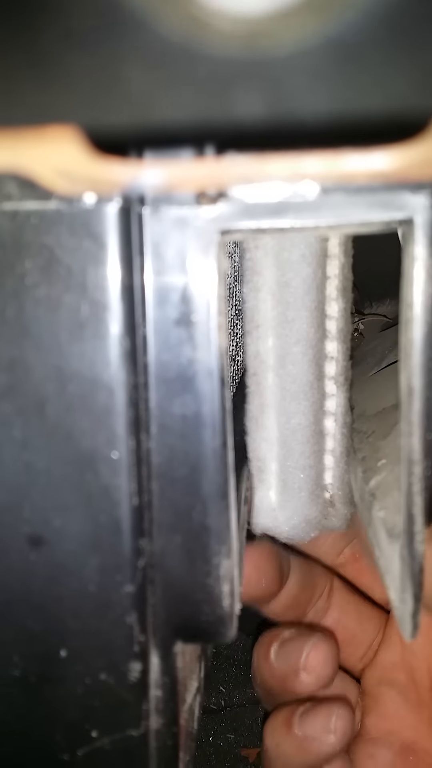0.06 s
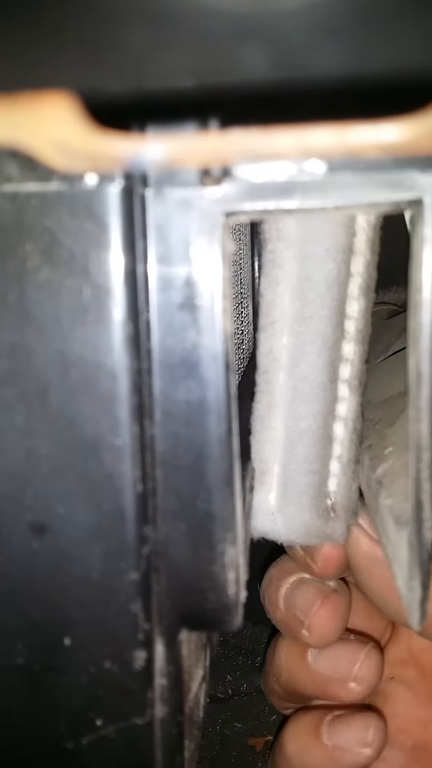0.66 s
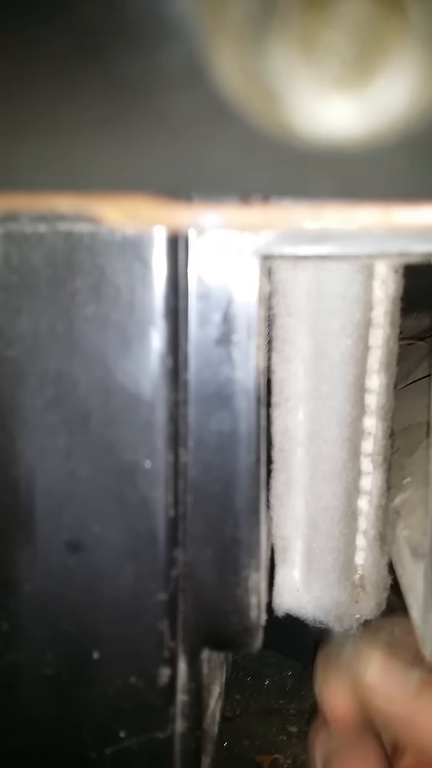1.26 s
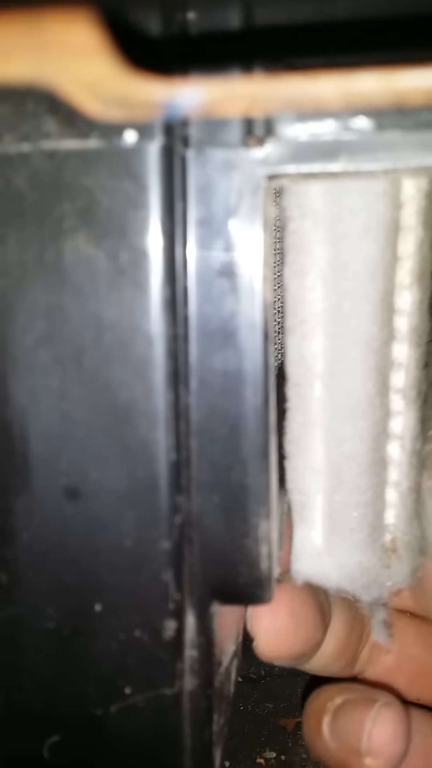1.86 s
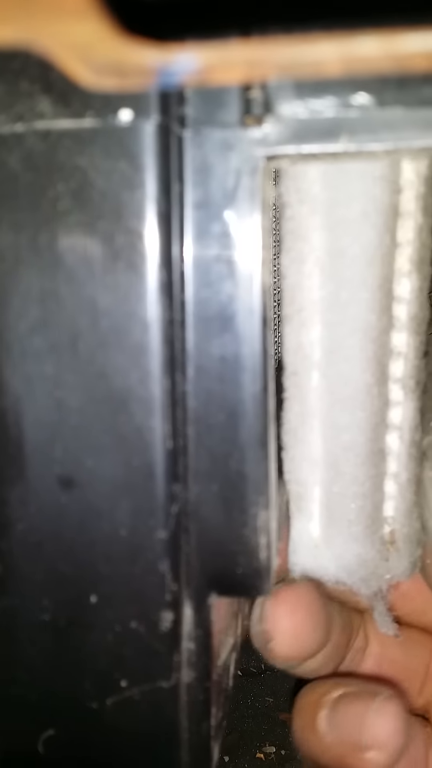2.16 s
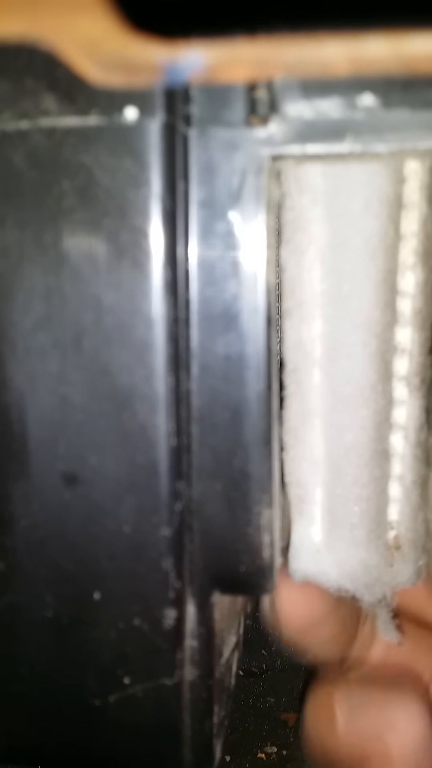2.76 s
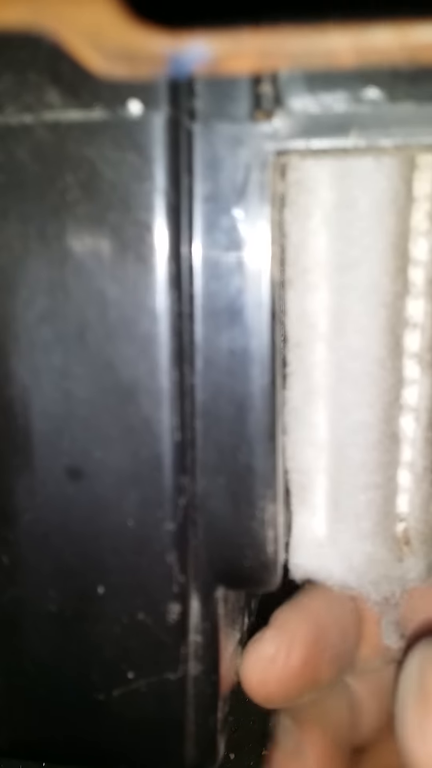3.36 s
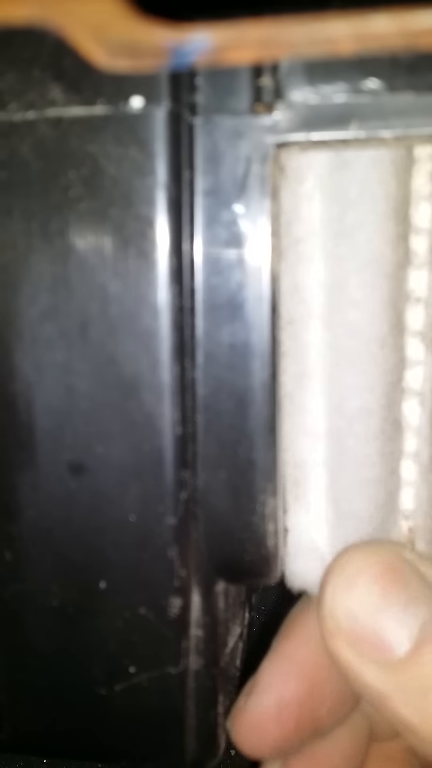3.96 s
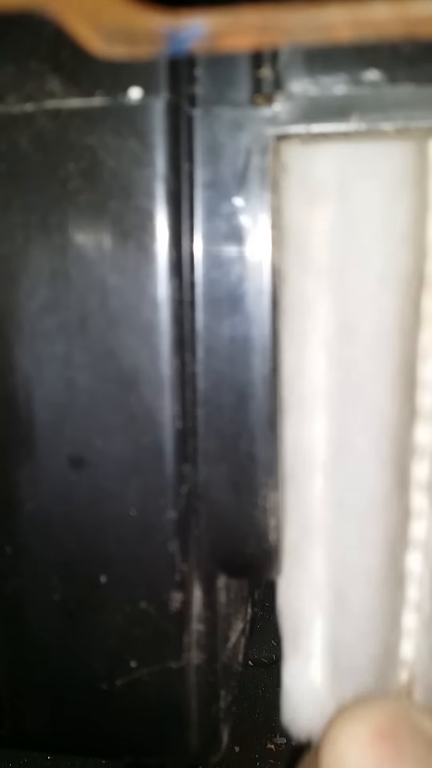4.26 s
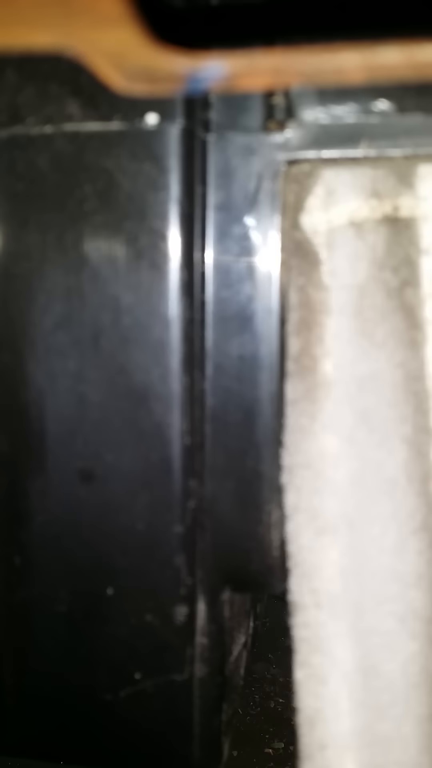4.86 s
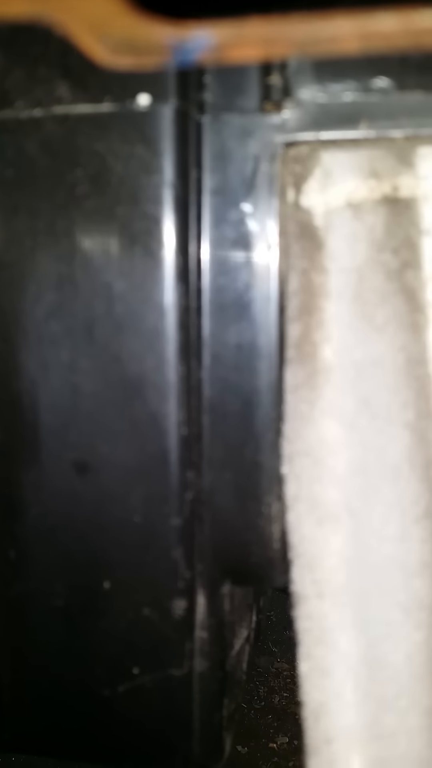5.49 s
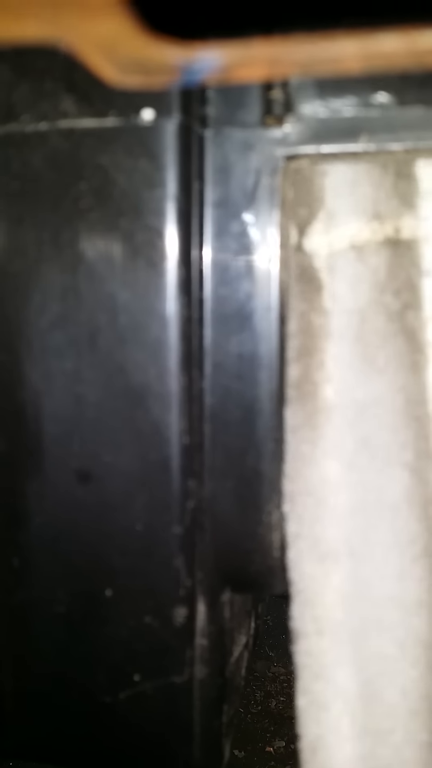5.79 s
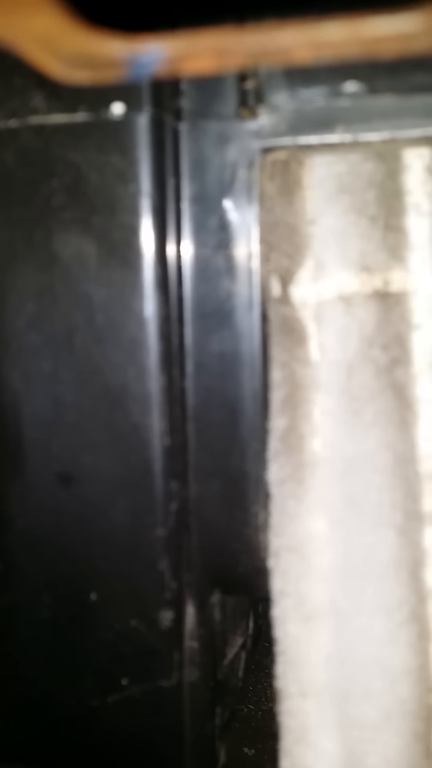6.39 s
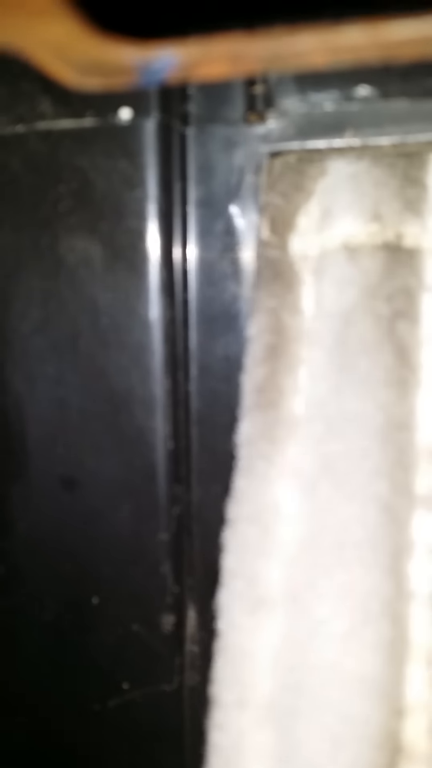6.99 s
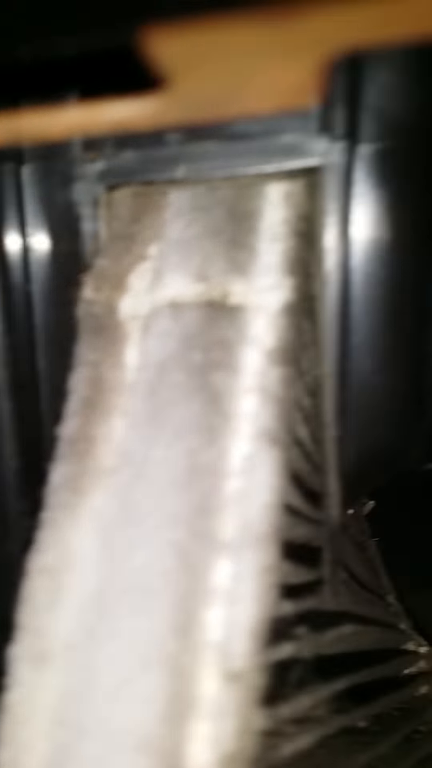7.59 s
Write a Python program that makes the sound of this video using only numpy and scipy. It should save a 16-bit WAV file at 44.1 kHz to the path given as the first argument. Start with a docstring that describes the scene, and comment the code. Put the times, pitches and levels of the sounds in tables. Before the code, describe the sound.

Close to the microphone, a hand works a pleated air filter out of its plastic housing. Light scrapes, finger rubs and soft taps come first. Then a hard tug brings a loud rasp with a cluster of snaps and hollow thuds. More pulls follow, the felt hissing over the plastic with sharp clicks and knocks. Small birds chirp faintly some way off over quiet outdoor air.

```python
"""A pleated air filter is worked out of its plastic housing by hand, close to the microphone.
Its felt drags over the plastic in strokes: many tiny slips hiss and make the walls rasp.
Pleats snap past the rim, the hollow box thuds and shudders, and fingers skid and tap on it.
Small birds chirp some way off, over faint outdoor air."""
import sys
import numpy as np
from scipy import signal
from scipy.fft import rfft, irfft, next_fast_len
from scipy.io import wavfile

SR = 44100
rng = np.random.default_rng(int(sys.argv[2]) if len(sys.argv) > 2 else 0)


def to_wav(sig):
    """Store sig (one row per channel, or 1-D mono) as 16-bit WAV at the path in sys.argv[1].

    Samples outside -1..1 are clipped; the rate is SR.
    """
    pcm = np.clip(np.atleast_2d(sig), -1, 1) * 32767
    pcm = np.round(pcm).astype(np.int16)
    wavfile.write(sys.argv[1], SR, pcm.T)  # frames by channels


N = 341334
TIME = np.arange(N) / SR
FFT_SIZE = next_fast_len(N + SR // 2)
FREQS = np.maximum(np.arange(FFT_SIZE // 2 + 1) * SR / FFT_SIZE, 1)
RUB_FADE_S = 0.059

# The tones at which the plastic walls ring. Each row: pitch in Hz, width in Hz, level in dB.
WALL_MODES = [(406, 340, -5.5), (536, 58, 3.5), (616, 36, 1), (801, 142, -1), (1140, 470, -7),
              (1427, 58, 0), (1820, 360, -8.5), (2234, 120, -4), (2408, 144, -1.5), (2740, 570, -5.5),
              (4190, 1280, -8.5)]
# The tones of the thin plastic under a nail. Each row: pitch in Hz, width in Hz, level in dB.
THIN_PLASTIC_MODES = [(1035, 180, -2.5), (1486, 140, 2.5), (1900, 900, -5), (2440, 430, 0.5),
                      (3400, 6900, -15)]
# Fingers rub the left wall. Each row: start and end in seconds, then rumble, hiss and rasp in dB.
FINGER_RUBS = [(1.275, 1.894, -46.5, -58.5, -41), (2.415, 2.958, -47, -69, -73),
               (4.916, 5.144, -36.5, -53, -44.5), (5.103, 5.592, -32.5, -51.5, -41)]


def felt_drag(hiss_db, rasp_db):
    """Fibres catch and let go, more often in a hard pull; they hiss and set the walls ringing."""
    # The tone colour of the hiss. Each row: frequency in Hz, level in dB.
    felt_spectrum = [(500, 5), (2000, -4), (4400, -1), (6200, -3.5), (7300, 0), (8400, -1), (10000, -5),
                     (12500, -9.5), (15000, -22)]
    # The left wall under the fingertips. Each row: pitch in Hz, width in Hz, level in dB.
    left_wall_modes = [(1392, 59, 12), (2080, 300, -19), (2160, 76, 3)]
    slips_per_s = 7000 * from_db(.5 * (hiss_db + 50))
    hiss = from_db(hiss_db) * radiate(slips(slips_per_s, spread_db=1), colour(felt_spectrum))
    wall_force = slips(.4 * slips_per_s, spread_db=1)
    walls = flexed(radiate(wall_force, resonances(WALL_MODES) * band(250, 2680)))
    fingertips = radiate(slips(3300, spread_db=-20), resonances(left_wall_modes))
    touch, _ = left_wall_contact()
    rasp = from_db(rasp_db - 3.5) * ((1 - 0.5 * touch) * walls + 0.23 * touch * fingertips)
    groan = duct_groan()
    return snags() * (hiss + rasp + groan)


def friction_levels(pull_fade_s=0.11, shake_follows=0.75):
    """Levels in dB of hiss, rasp and box shake: pulls, scrapes and rubs add to the resting grip."""
    # Four long pulls on the filter. Each row: time in seconds, hiss in dB, rasp in dB.
    first_pull = [(0.58, -62.5, -51.5), (0.77, -60.5, -51), (0.842, -49, -41.5), (1.146, -45.5, -39),
                  (1.154, -42, -32), (1.222, -56.5, -43), (1.27, -75, -55)]
    tug = [(4.56, -51, -48), (4.72, -44, -36.5), (4.75, -52.5, -45)]
    slide = [(5.95, -42, -35.5), (5.966, -46, -39.5), (6.238, -54.5, -55.5), (6.264, -49, -48),
             (6.36, -61.5, -55.5)]
    last_pull = [(6.725, -53, -46.5), (6.79, -49, -48), (6.866, -40.5, -32.5), (6.918, -46.5, -38),
                 (7.0, -48, -40.5), (7.134, -36.5, -29.5), (7.15, -50.5, -41), (7.252, -37.5, -30),
                 (7.29, -51, -41), (7.355, -45, -39), (7.408, -42, -38.5), (7.486, -59, -52),
                 (7.51, -56.5, -81)]
    # Short scrapes as the grip shifts or the filter jerks.
    # Each row: start, rise and fall in seconds, hiss in dB, rasp in dB.
    scrapes = [(0.211, 0.039, 0.037, -48.5, -43), (0.449, 0.071, 0.041, -52.5, -43.5),
               (1.809, 0.1, 0.056, -45.5, -42), (2.02, 0.042, 0.027, -53, -44.5),
               (2.595, 0.0029, 0.034, -44, -37), (2.78, 0.005, 0.17, -51, -52),
               (2.926, 0.03, 0.075, -49, -50), (3.036, 0.058, 0.043, -50.5, -51),
               (3.867, 0.018, 0.24, -53.5, -52), (4.065, 0.046, 0.061, -39.5, -36.5),
               (4.203, 0.091, 0.077, -35.5, -31.5), (4.419, 0.071, 0.072, -32, -28.5),
               (4.763, 0.0073, 0.05, -39, -50), (4.8, 0.043, 0.32, -52, -50.5),
               (5.498, 0.072, 0.57, -48.5, -49.5), (5.751, 0.042, 0.17, -47.5, -42),
               (6.442, 0.032, 0.12, -42, -38.5), (6.499, 0.1, 0.063, -49.5, -37),
               (7.527, 0.047, 0.078, -42.5, -39), (7.608, 0.093, 0.22, -47.5, -46)]
    settled = np.where(TIME < .11, .1, 1)  # quieter until the fingers settle
    power = settled * from_db([[-62.5], [-58.5], [-66.5]]) ** 2  # a held filter is never quite still
    for pull, shake_db in (first_pull, -47), (tug, -40.5), (slide, -40), (last_pull, -39):
        times, hisses, rasps = np.transpose(pull)
        hiss, rasp = np.interp(TIME, times, hisses), np.interp(TIME, times, rasps)
        shake = shake_db + shake_follows * (rasp - np.mean(rasps))
        grip = held(times[0] - pull_fade_s, times[-1] + pull_fade_s, pull_fade_s)
        power += (grip * from_db([hiss + 4, rasp + 2.5, shake])) ** 2
    for start, rise, fall, hiss, rasp in scrapes:
        power += (swell(start, rise, fall) * from_db([[hiss], [rasp], [rasp]])) ** 2
    for start, end, _, hiss, rasp in FINGER_RUBS:
        power[:2] += (held(start, end, RUB_FADE_S) * from_db([[hiss], [rasp]])) ** 2
    return 10 * np.log10(power)


def slips(per_s, spread_db):
    """Friction is a hail of tiny slips of uneven size; gives two unrelated forces."""
    chance = np.clip(per_s / SR, 1e-4, 1)
    sizes = from_db(spread_db * np.minimum(rng.exponential(1, N), 4))
    slipping = rng.random(N) < chance
    return unit_power(slipping * sizes * rng.standard_normal((2, N)) / np.sqrt(chance))


def snags(per_s=90, release_s=.0022):
    """The loudness of the friction wavers, jumps each time the felt snags, and dies back."""
    jumps = (rng.random(N) < per_s / SR) * rng.random(N)
    release = signal.lfilter([1], [1, -np.exp(-1 / (release_s * SR))], jumps + 1e-18)
    waver = from_db(drift(70) + .5 * drift(20))
    return unit_power(waver * (1 + .95 * release))


def flexed(sound, pitch_wander=.03):
    """The plastic bends under the hand, so its tones wander."""
    position = np.cumsum(1 + pitch_wander * drift(5)) % N
    return np.array([np.interp(position, np.arange(N), side) for side in sound])


def duct_groan():
    """The filter jams and makes the air in the duct groan."""
    # The moments it jams. Each row: start, rise and fall in seconds, level in dB.
    jams = [(6.68, 0.089, 0.26, -42.5), (6.8, 0.1, 0.047, -36), (6.98, 0.23, 0.1, -38.5)]
    # The tones of the air in the duct. Each row: pitch in Hz, width in Hz, level in dB.
    duct_modes = [(573, 120, -4.5), (850, 69, 4), (976, 90, -2), (1340, 110, 1)]
    return strokes(jams) * radiate(slips(3500, spread_db=0.5), resonances(duct_modes) * band(310, 1170))


def pleat_snaps(rise_s=0.00082, wall_delay_s=0.000963):
    """A pleat springs past the rim: a short crackle, heard directly and as a knock through the walls."""
    # Each row: start in seconds, crack in dB, knock in dB, seconds to fade by 60 dB.
    snaps = [(0.131, -67, -40, 0.04), (1.151, -33.5, -37, 0.15), (2.127, -39, -31, 0.037),
             (2.561, -50, -37.5, 0.1), (2.802, -36.5, -28, 0.038), (3.213, -18.5, -20, 0.026),
             (4.18, -24, -28.5, 0.021), (4.283, -42, -19, 0.018), (4.312, -23.5, -13, 0.041),
             (4.351, -19.5, -9.5, 0.025), (4.414, -36, -25, 0.041), (4.466, -47, -20.5, 0.11),
             (5.513, -36, -37, 0.024), (5.574, -36, -34, 0.033), (5.778, -35, -16.5, 0.0087),
             (5.794, -27, -15, 0.013), (5.905, -17.5, -17.5, 0.071), (5.921, -8.5, -18, 0.014),
             (5.934, -39, -11.5, 0.011), (6.01, -46, -15, 0.016), (7.124, -23, -34, 0.023),
             (7.469, -27.5, -36, 0.018), (7.586, -45, -21.5, 0.015), (7.610, -22.5, -11.5, 0.029)]
    # The tone colours of crack and knock. Each row: frequency in Hz, level in dB.
    crack_spectrum = [(500, -12), (2000, 35.5), (3600, 34.5), (6000, 28), (8000, 32), (11000, 24.5),
                      (15000, 13)]
    knock_spectrum = [(120, -21.5), (330, 18.5), (600, 13), (950, 13.5), (1600, 1.5), (2500, 6),
                      (4000, -9.5), (10000, -26.5)]
    crack, knock = np.zeros((2, 2, N))
    t = TIME[:SR // 5]
    for start, crack_db, knock_db, fade_s in snaps:
        envelope = from_db(-60 * t / fade_s) * (1 - np.exp(-t / rise_s))
        burst = envelope * rng.standard_normal((2, len(t)))
        add_at(crack, start, from_db(crack_db) * burst)
        add_at(knock, start, from_db(knock_db) * burst)
    walls = colour(knock_spectrum) * (1 + .5 * resonances(WALL_MODES))
    delay = np.exp(-2j * np.pi * FREQS * wall_delay_s)  # the walls take a moment to move
    return radiate(crack, colour(crack_spectrum)) + radiate(knock, walls * delay)


def box_thuds(rise_s=0.0017, cycles=8.5, wall_fade_s=0.089, right_lag_s=0.00053):
    """A soft blow swings the box for a few cycles; harder blows also ring the wall more."""
    # Each row: start in seconds, level in dB, pitch in Hz.
    blows = [(0.141, -28.5, 132), (1.149, -22, 163), (1.411, -35, 147), (1.636, -29, 191),
             (1.851, -23.5, 157), (1.824, -26, 88.4), (1.946, -27, 268), (1.987, -28.5, 127),
             (2.021, -30, 142), (2.146, -19, 174), (2.49, -33.5, 112), (2.562, -31, 94),
             (2.701, -34.5, 103), (2.848, -24.5, 138), (2.924, -30, 95), (3.214, -17, 604),
             (3.215, -26, 138), (3.216, -17, 323), (3.251, -25.5, 134), (3.463, -30.5, 142),
             (3.506, -24, 174), (3.694, -36, 253), (4.137, -24, 170), (4.252, -18.5, 134),
             (4.286, -10.5, 128), (4.314, -11.5, 264), (4.316, -21, 95), (4.35, -8, 153),
             (4.421, -18.5, 124), (4.466, -9.5, 347), (4.472, -9.5, 163), (5.119, -20.5, 110),
             (5.142, -16, 132), (5.254, -24.5, 181), (5.278, -18, 196), (5.378, -25, 240),
             (5.408, -22, 133), (5.467, -19.5, 158), (5.498, -20.5, 132), (5.909, -18.5, 129),
             (5.957, -18.5, 165), (6.402, -24.5, 141), (6.596, -23.5, 141), (7.108, -20.5, 142),
             (7.404, -20.5, 305), (7.611, -27, 820), (7.612, -26, 154)]
    out = np.zeros((2, N))
    t = np.maximum(TIME[:SR // 4] - np.array([[0], [right_lag_s]]), 0)
    for start, db, hz in blows:
        swing = np.sin(2 * np.pi * hz * t) * from_db(-60 * hz * t / cycles)
        wall_hz = 335 * rng.uniform(0.85, 1.062)
        wall = np.sin(2 * np.pi * wall_hz * t) * from_db(-6 + 0.8 * db - 60 * t / wall_fade_s)
        blow = from_db(db + 7.5) * (1 - np.exp(-(t / rise_s) ** 2)) * (swing + wall)
        low_cut = signal.butter(3, 0.73 * hz, "high", fs=SR, output="sos")
        add_at(out, start, signal.sosfilt(low_cut, blow))
    touch, _ = left_wall_contact()
    return out * panned(-3.5 + 9 * np.sqrt(touch))


def box_shudder(shake_db):
    """Slow sticking and slipping shakes the box: the filter on the right, fingers deeper on the left."""
    # The low tones of the box. Each row: pitch in Hz, width in Hz, level in dB.
    box_modes = [(63.7, 22.2, 4.5), (111.7, 44.5, 2.5), (120.6, 13.7, 7.5), (167.5, 37.7, -5),
                 (226, 85, -7.5), (318, 104, -10)]
    box = resonances(box_modes)
    from_filter = radiate(slips(900, spread_db=3.5), box * band(123, 435))
    from_fingers = radiate(slips(150, spread_db=5), box * band(58, 258, order=3))
    _, rumble = left_wall_contact()
    return from_db(shake_db - 1) * panned(-2.5) * from_filter + rumble * panned(6) * from_fingers


def left_wall_contact():
    """How much the fingers touch the left wall, and how strongly their rubbing rumbles."""
    touch, rumble = np.zeros((2, N))
    for start, end, rumble_db, _, _ in FINGER_RUBS:
        contact = held(start, end, RUB_FADE_S)
        touch += contact
        rumble += contact * from_db(rumble_db)
    return touch, rumble


def nail_skids():
    """A nail chatters over the wall in fine slips and sets the thin plastic ringing."""
    # Each row: start, rise and fall in seconds, level in dB.
    skids = [(4.763, 0.027, 0.014, -33), (4.93, 0.052, 0.077, -47.5), (5.043, 0.03, 0.005, -40),
             (6.03, 0.069, 0.035, -42)]
    plastic = resonances(THIN_PLASTIC_MODES) * band(790, 5800)
    return strokes(skids) * radiate(slips(2000, spread_db=3), plastic)


def fibre_ticks():
    """Single fibres and pleat edges flick the rim with tiny bright ticks."""
    # Each row: start in seconds, level in dB.
    ticks = [(2.482, -29), (3.779, -43), (4.83, -36), (7.169, -32), (7.333, -30)]
    # The tone colour of a tick. Each row: frequency in Hz, level in dB.
    tick_spectrum = [(1500, -18), (6000, -16), (11000, -5.5)]
    return radiate(flicks(ticks, fade_s=.016), colour(tick_spectrum))


def finger_taps():
    """As the grip shifts, fingertips and nails tap the wall and the thin plastic, and both ring."""
    # Each row: start in seconds, level in dB.
    taps = [(0.66, -42), (0.7, -37), (1.102, -27), (1.851, -36), (2.147, -31), (3.346, -42), (3.544, -42),
            (3.694, -40), (3.812, -41), (5.644, -38), (5.951, -25), (7.372, -30)]
    plastic = (resonances(WALL_MODES) + .5 * resonances(THIN_PLASTIC_MODES)) * band(250, 2500)
    return radiate(flicks(taps, fade_s=.03), plastic)


def birds(syllable_s=.046, length_spread=.15):
    """Birds sing hoarse syllables that arch up and down in pitch, blurred by outdoor echoes."""
    # Two kinds of call, both stepping down. Each row: seconds after the loudest syllable,
    # top pitch in Hz, level in dB, share by which the pitch sags at both ends.
    chirrup = [(-.036, 5450, -13, .05), (0, 4750, 0, .25), (.038, 3700, -6, .15), (.08, 3700, -1, .29),
               (.119, 3700, -4, .25)]
    chip = [(0, 5150, 0, .29), (.068, 3950, -6, .25)]
    # When each kind is sung. Each row: time in seconds, level in dB, pitch multiplier.
    chirrup_calls = [(.183, -48, 1), (1.387, -43.5, 1), (3.583, -44, 1)]
    chip_calls = [(1.716, -49, 0.91), (2.213, -50.5, 1.02), (2.288, -55, 1), (2.93, -53.5, 1),
                  (3.345, -55, 0.99), (5.354, -50, .96), (5.646, -49, 0.98), (6.183, -49, 0.97)]
    song = np.zeros(N)
    hoarseness = 1 + .055 * drift(1300)
    for syllables, calls in (chirrup, chirrup_calls), (chip, chip_calls):
        for call_s, call_db, ratio in calls:
            for after_s, top_hz, syllable_db, sag in syllables:
                length = int(syllable_s * SR * (1 + length_spread * rng.uniform(-0.85, 1)))
                span = round((call_s + after_s) * SR) - length // 2 + np.arange(length)
                along = np.linspace(-1, 1, length)
                arch = 1 - sag * np.sin(np.pi / 2 * along) ** 2
                pitch = ratio * top_hz * arch * hoarseness[span]
                stress_db = 7 * rng.uniform(-.5, 1) * along  # usually favours the falling end
                envelope = from_db(call_db + syllable_db + stress_db) * np.sqrt(1 - along ** 2)
                song[span] += envelope * np.sin(2 * np.pi * np.cumsum(pitch) / SR)
    song *= from_db(2.5 * drift(200))  # the level flutters
    return song * panned(-3.1) + from_db(-1) * echoes(song[None], fade_s=.22, count=120)


def outdoor_air():
    """The air outdoors is a faint, steady noise, mostly bass."""
    # Each row: frequency in Hz, level in dB.
    air_spectrum = [(30, -11), (75, 1.5), (400, -17), (860, -18), (1650, -45), (6000, -31), (8000, -27),
                    (14000, -37)]
    return from_db(-52) * radiate(rng.standard_normal((2, N)), colour(air_spectrum))


def radiate(force, response):
    """Two unrelated forces take on a tone colour and reach the ears, most alike near 130 Hz."""
    # Each row: frequency in Hz, how alike the ears are (limited below to just under 1).
    ear_likeness = [(60, -0.44), (130, 2), (350, 0.2), (700, 0.62), (1400, 0.04), (2500, 0.15), (4000, 0)]
    # Each row: frequency in Hz, how much louder the left ear is in dB.
    ear_balance = [(110, -1), (380, -2), (700, -0.6), (2400, 1.1), (4400, 0)]
    alike = np.clip(over_hz(ear_likeness), -.98, .98)
    mid, side = rfft(force, FFT_SIZE)
    ears = np.sqrt(1 + alike) * mid + np.sqrt(1 - alike) * side * np.array([[1], [-1]])
    unit_response = response / np.sqrt(np.mean(np.abs(response) ** 2))
    return irfft(ears * panned(over_hz(ear_balance)) * unit_response, FFT_SIZE)[:, :N]


def echoes(sound, fade_s, count):
    """Scattered reflections, different on each side, die away by 60 dB in fade_s."""
    t = TIME[:SR // 2]
    tail = rng.standard_normal((2, len(t))) * (rng.random((2, len(t))) < count / len(t))
    tail *= from_db(-60 * t / fade_s) * (t > .004)
    tail /= np.sqrt(np.sum(tail ** 2, axis=1, keepdims=True))
    return signal.fftconvolve(sound, tail, axes=1)[:, :N]


def flicks(contacts, fade_s):
    """The force of light contacts: tiny bursts of noise that die at once."""
    force = np.zeros((2, N))
    t = TIME[:SR // 10]
    for start, db in contacts:
        add_at(force, start, from_db(db - 60 * t / fade_s) * rng.standard_normal((2, len(t))))
    return force


def add_at(track, start_s, sound):
    """Mix a short stereo sound into a track."""
    at = round(start_s * SR)
    track[:, at:at + sound.shape[1]] += sound[:, :N - at]


def swell(start, rise, fall, roundness=0.67):
    """A brief stroke gathers speed and stops again: from 0 to 1 and back."""
    return np.interp(TIME, [start, start + rise, start + rise + fall], [0, 1, 0]) ** roundness


def strokes(rows):
    """Several swells, each at its own level."""
    return sum(from_db(db) * swell(start, rise, fall) for start, rise, fall, db in rows)


def held(start, end, fade_s):
    """A contact fades in, holds at 1 and fades out."""
    return np.clip(np.minimum(TIME - start, end - TIME) / fade_s, 0, 1)


def drift(turns_per_s):
    """A random wander around zero, roughly 1 in size."""
    points = rng.standard_normal(N // 20)
    return np.interp(TIME * turns_per_s, np.arange(len(points)), points)


def colour(spectrum):
    """A response with this tone colour that never sounds before it is struck (minimum phase)."""
    cepstrum = irfft(np.log(from_db(over_hz(spectrum))), FFT_SIZE)
    cepstrum[1:FFT_SIZE // 2] *= 2
    cepstrum[FFT_SIZE // 2 + 1:] = 0
    return np.exp(rfft(cepstrum))


def resonances(modes):
    """The response of several ringing tones, added with alternating signs."""
    return sum((-1) ** k * from_db(db) / (1 + 1j * (FREQS ** 2 - hz ** 2) / (FREQS * width))
               for k, (hz, width, db) in enumerate(modes))


def band(low_hz, high_hz, order=2):
    """A response that passes one range of frequencies."""
    return signal.freqs(*signal.butter(order, [low_hz, high_hz], "band", analog=True), FREQS)[1]


def over_hz(points):
    """Fill in a table of frequencies and values at every frequency."""
    hz, value = np.transpose(points)
    return np.interp(np.log(FREQS), np.log(hz), value)


def panned(db):
    """Left and right gains; positive dB leans left."""
    return from_db(np.array([[.5], [-.5]]) * db)


def from_db(db):
    """Turn decibels into a gain."""
    return 10 ** (np.asarray(db) / 20)


def unit_power(x):
    """Scale to an average power of 1."""
    return x / np.sqrt(np.mean(x ** 2) + 1e-20)


def scene():
    """The handling echoes briefly in the cramped space, over birds and outdoor air."""
    hiss_db, rasp_db, shake_db = friction_levels()
    handling = felt_drag(hiss_db, rasp_db) + box_shudder(shake_db)
    handling += nail_skids() + fibre_ticks() + finger_taps() + pleat_snaps() + box_thuds()
    air = outdoor_air()
    reflections = from_db(-10.5) * echoes(handling, fade_s=0.16, count=1500)
    return handling + reflections + birds() + air


def record(dry, low_cut_hz=50, high_cut_hz=14700, ceiling=.85):
    """The deep bass rolls off, the tallest peaks are rounded and the top treble is cut steeply."""
    thinned = signal.sosfilt(signal.butter(2, low_cut_hz, "high", fs=SR, output="sos"), dry)
    rounded = ceiling * np.tanh(thinned / ceiling)
    return signal.sosfilt(signal.ellip(10, .3, 80, high_cut_hz, fs=SR, output="sos"), rounded)


dry = scene()
out = record(dry)
to_wav(out)
```